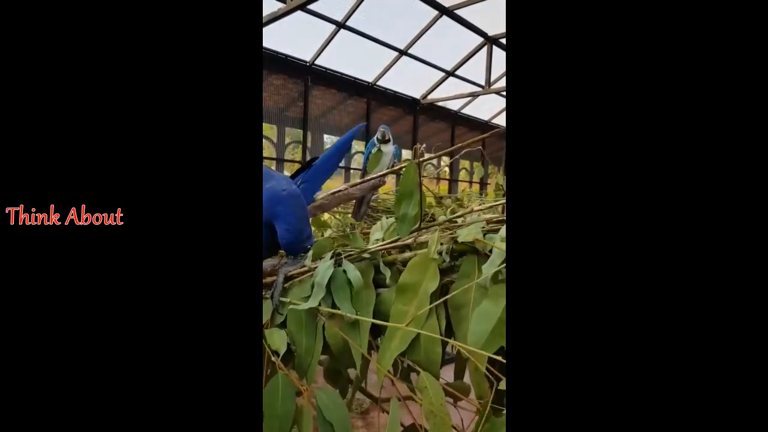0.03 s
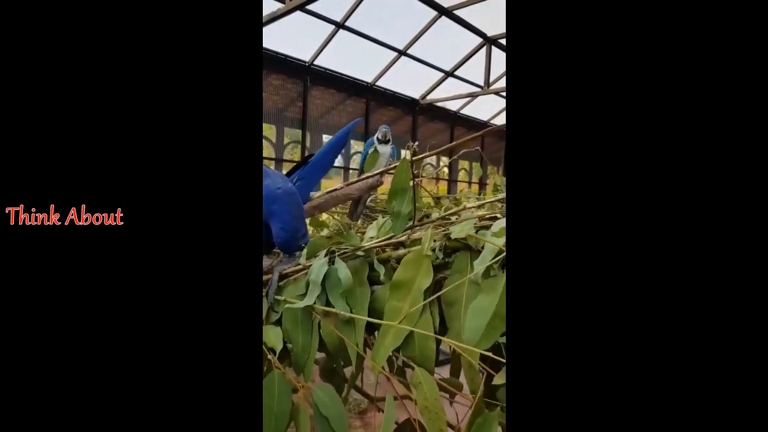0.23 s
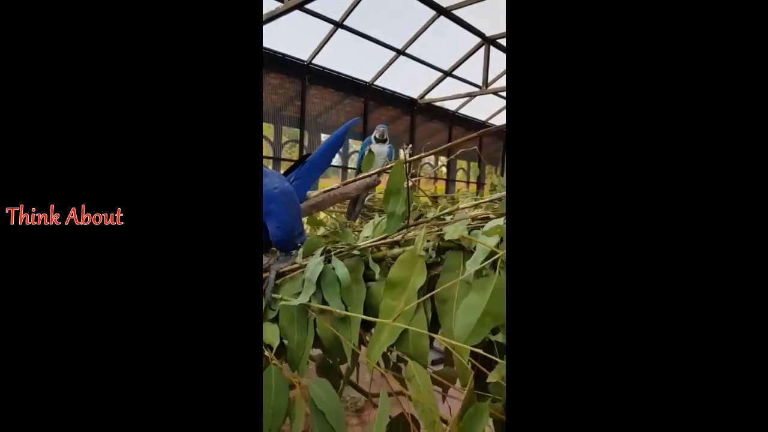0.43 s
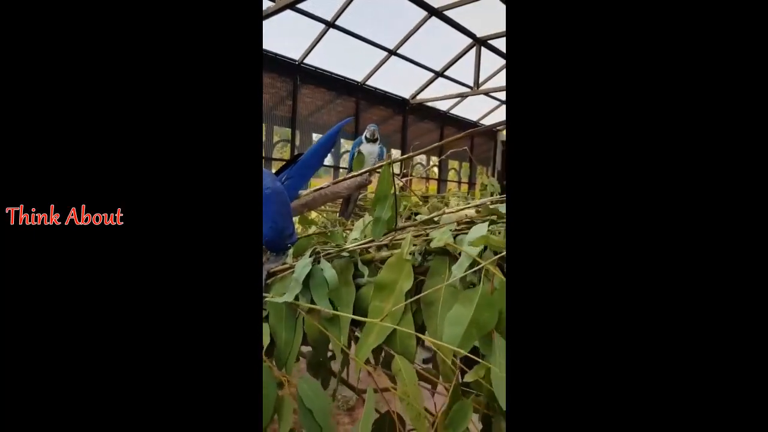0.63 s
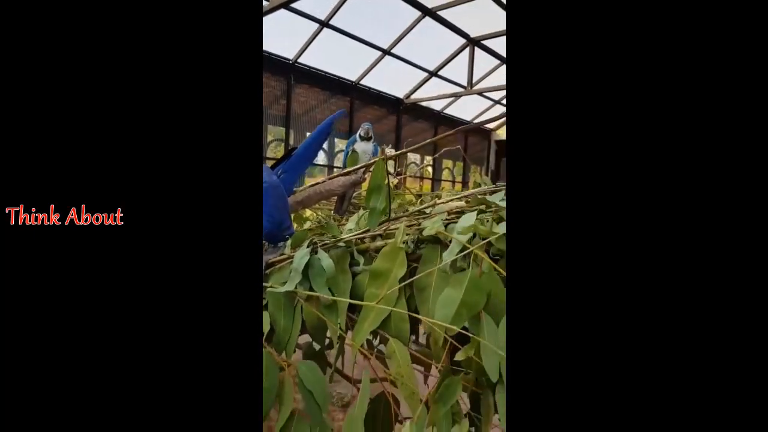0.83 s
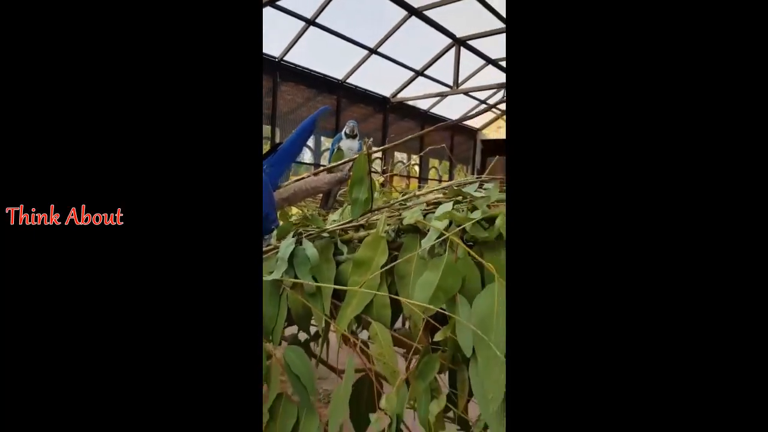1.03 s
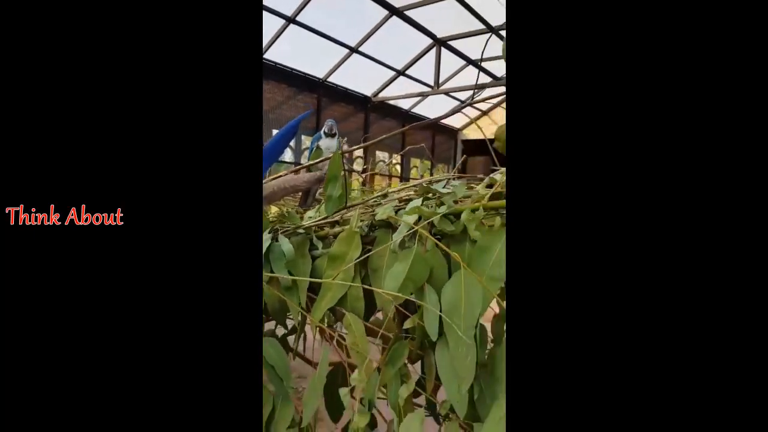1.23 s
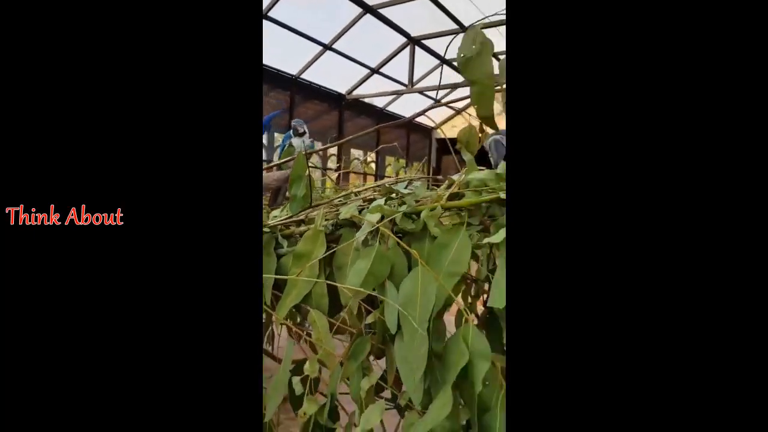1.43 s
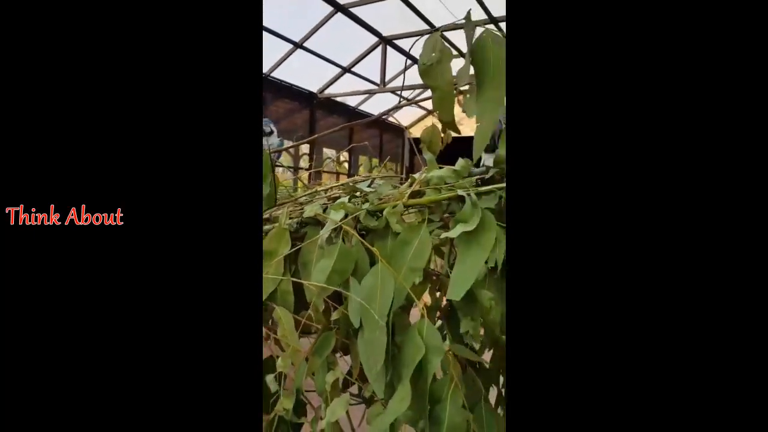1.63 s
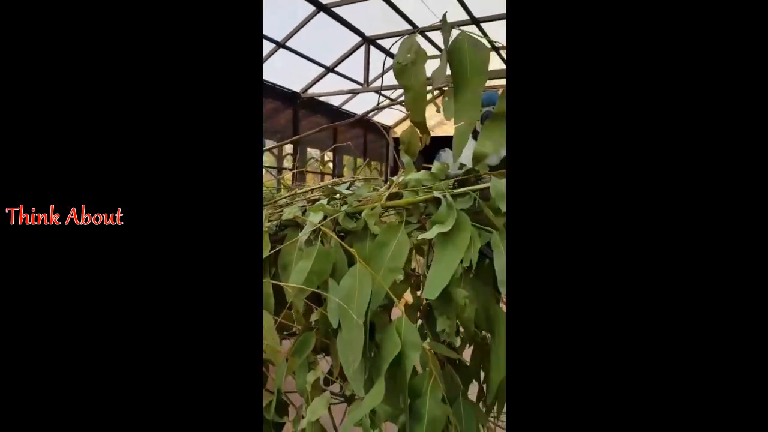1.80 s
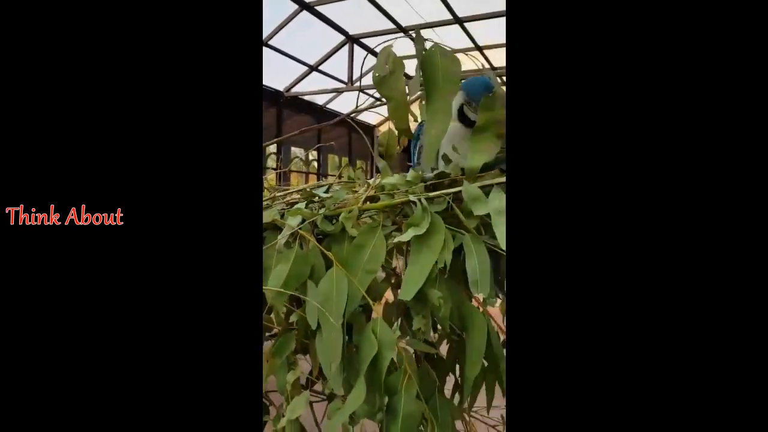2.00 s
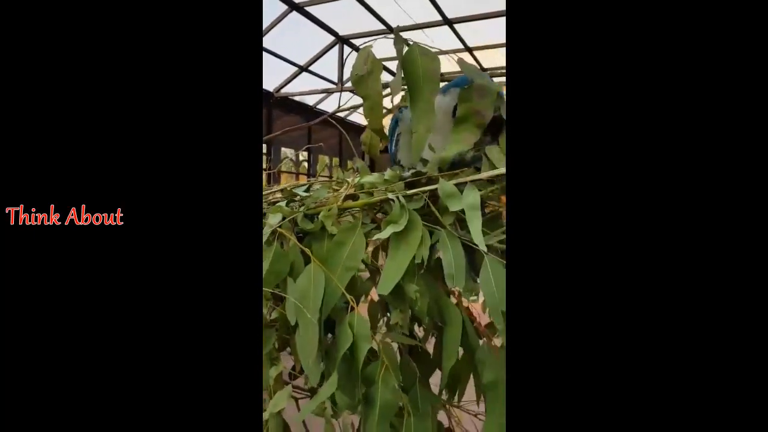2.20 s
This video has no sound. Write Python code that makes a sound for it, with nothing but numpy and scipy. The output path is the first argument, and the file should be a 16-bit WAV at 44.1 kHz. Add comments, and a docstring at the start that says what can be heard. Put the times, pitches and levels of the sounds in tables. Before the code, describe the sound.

A macaw gives one short, harsh call close by in an aviary, a growl breaking into a rasping rattle. Twigs snap before and after it, and leaves rustle softly over a low, throbbing machinery hum.

```python
"""A macaw gives one harsh call close by in a netted aviary: a low growl breaking into a rasping rattle.
Syrinx pulses, each with a puff of turbulence, ring the throat and beak resonances.
Leaves rustle and twigs snap as birds clamber through cut branches; one soft scrape comes late.
Machinery hums, its close tones beating in a slow throb, over faint open-air noise."""
import sys
import numpy as np
from scipy import signal
from scipy.io import wavfile

SR = 44100
rng = np.random.default_rng(int(sys.argv[2]) if len(sys.argv) > 2 else 0)


def inscribe(sig):
    """Save sig as 16-bit PCM at rate SR to the path in sys.argv[1].

    A 1-D sig is mono; a 2-D sig holds one channel per row.
    Samples are clipped to [-1, 1] before scaling.
    """
    pcm = np.round(np.clip(np.atleast_2d(sig).T, -1, 1) * 32767)
    wavfile.write(sys.argv[1], SR, pcm.astype(np.int16))


N = 99577
T = np.arange(N) / SR

# Twig crack and leaf crackle resonances: (frequency [Hz], width [Hz], relative level [dB])
CRACK_MODES = [(2430, 150, 10), (4120, 180, 9.5), (4900, 870, 2.5), (7350, 530, -0.5), (9640, 1450, 1),
               (12700, 1400, -9)]


def macaw():
    """Pulses and rasp ring the moving throat and the fixed upper resonances."""
    # Throat and beak resonances: (frequency [Hz], width [Hz], relative level [dB])
    throat_modes = [(273, 134, -11), (588, 164, -6), (882, 256, -3), (1036, 150, 5.5), (1540, 130, 2),
                    (1798, 73, 3.5)]
    upper_modes = [(2700, 89, -31), (3106, 134, 5), (3280, 156, 5), (3580, 92, 2), (3770, 69, 2),
                   (6310, 340, -2), (7050, 320, -4), (10800, 2600, -25)]
    # Throat resonances sink mid-call: (time [s], frequency ratio [1])
    throat_shift = [(1.045, 1.24), (1.056, 0.95), (1.09, 0.98), (1.125, .85), (1.19, 0.894), (1.24, .99),
                    (1.34, 1.034)]
    throat_rasp, upper_rasp, upper_db, right_lag_s = .48, .42, -3.5, .00022
    pulses, bright = syrinx()
    drive = pulses + throat_rasp * puffs(pulses)
    shift, = in_time(throat_shift)
    ratios = np.linspace(shift.min(), shift.max(), 9)
    low = 0
    for ratio, share in zip(ratios, np.eye(len(ratios))):  # crossfade static throat shapes
        modes = [(hz * ratio, width_hz, db) for hz, width_hz, db in throat_modes]
        low = low + body(drive * np.interp(shift, ratios, share), modes)
    low = butterworth(low, 2, [140, 2300], "band")
    high = body(bright + upper_rasp * puffs(bright), upper_modes)
    voice = low + from_db(upper_db) * butterworth(high, 2, [2000, 13500], "band")
    direct = np.array([voice, np.roll(voice, int(right_lag_s * SR))])
    return pan(direct + aviary(voice, near_db=-6.5, room_db=-18), left_db=1.1)


def syrinx():
    """Bursts of a few hard pulses interrupt the growl. Returns (throat, upper) drives."""
    # Rattle: (peak time [s], pulse rate [Hz], level [dB], Gaussian sigma [s], upper drive offset [dB])
    bursts = [(1.0388, 295, -21, .005, -5), (1.2242, 258, -24, .0021, 2), (1.2472, 256, -21.2, .0043, 2),
              (1.2768, 259, -20.8, .0042, 1.5), (1.3071, 272, -21, .0047, 2), (1.3355, 263, -22, .0056, 0),
              (1.3678, 230, -31, .004, -7)]
    jitter_s = .00014
    drive, steps = growl(), np.arange(-1, 4)
    for peak_s, hz, db, sigma_s, upper_db in bursts:
        times_s = peak_s + steps / hz + jitter_s * rng.standard_normal(len(steps))
        pulses = np.zeros(N)
        pulses[(times_s * SR).astype(int)] = from_db(db) * np.sqrt(SR / hz)
        swell = gaussian(peak_s, sigma_s)
        drive = (1 - swell) * drive + swell * pulses * from_db([[0], [upper_db]])
    return drive


def growl():
    """Unevenly timed strong-weak pulses. Returns (throat, upper) drives."""
    # Voice pitch: (time [s], pulse rate [Hz])
    pitch = [(1.04, 297), (1.062, 264), (1.09, 253), (1.115, 228), (1.205, 213), (1.245, 245), (1.34, 240)]
    # Depth of jitter and alternation: (time [s], share [0-1])
    unevenness = [(1.05, .4), (1.085, .25), (1.12, 1)]
    # Growl envelope: (time [s], level [dB], upper drive offset [dB])
    envelope = [(1.034, -31, -1), (1.06, -28, -2), (1.085, -29, -7.5), (1.11, -34, -5.5),
                (1.16, -32, -11.5), (1.2, -30.5, -6.5), (1.235, -35.5, -4), (1.265, -28, -1.5),
                (1.345, -28, 1), (1.351, -38, -2)]
    max_jitter_s, shimmer_db, max_alternation_db = .00048, 1.0, 1.2
    hz, = in_time(pitch)
    uneven, = in_time(unevenness)
    level_db, upper_db = in_time(envelope)
    voiced = (T > envelope[0][0]) * (T < envelope[-1][0])
    cycles = np.cumsum(hz * voiced) / SR
    onsets = np.flatnonzero(np.diff(np.ceil(cycles)))
    jitter, shimmer = rng.standard_normal((2, N))[:, :len(onsets)]
    alternation_db = max_alternation_db * uneven[onsets] * (-1) ** np.arange(len(onsets))
    pulse_db = level_db[onsets] + shimmer_db * shimmer + alternation_db
    offsets = (max_jitter_s * SR * uneven[onsets] * jitter).astype(int)
    pulses = np.zeros(N)
    pulses[onsets + offsets] = from_db(pulse_db) * np.sqrt(SR / hz[onsets])
    return np.array([pulses, pulses * from_db(upper_db)])


def puffs(pulses, decay_s=.0014):
    """Decaying turbulence after each pulse."""
    pole = np.exp(-2 / (decay_s * SR))
    power = signal.lfilter([1 - pole], [1, -pole], pulses ** 2 + 1e-18)
    return np.sqrt(power) * rng.standard_normal(N)


def twigs():
    """Each break rings the wood; tearing fibres add a bright crack."""
    # Snaps: (time [s], level [dB], main ring [Hz], ring width [Hz], low ring [Hz], low ring offset [dB],
    # crack decay [s], crack offset [dB], pan left [dB])
    snaps = [(0.2653, -15.5, 4200, 520, 2720, -5, .0028, -22, 2.3),
             (0.7128, -19, 3920, 380, 2150, -9, .0013, 1.5, 3),
             (1.371, -45, 3480, 400, 1350, -8, .005, 6, -3),
             (1.483, -26, 4170, 500, 1400, -10, .0024, -13, 5),
             (1.7771, -14.5, 3500, 360, 2200, -12, .0023, -22, -3)]
    break_db = 4.5
    knock_mode = (1400, 600, -23)  # (frequency [Hz], width [Hz], relative level [dB])
    out = 0
    for at_s, db, hz, width_hz, low_hz, low_db, decay_s, crack_db, left_db in snaps:
        impulse = from_db(break_db) * (np.arange(N) == int(at_s * SR))
        wood = body(impulse, [(hz, width_hz, 0), (low_hz, width_hz, low_db), knock_mode])
        tear = rng.standard_normal(N) * (T >= at_s) * np.exp(-np.abs(T - at_s) / decay_s)
        crack = from_db(crack_db) * body(tear, CRACK_MODES)
        out = out + from_db(db) * pan(wood + crack, left_db)
    return out + aviary(out.mean(axis=0), near_db=-1.5, room_db=-6)


def leaves():
    """Soft brushing of leaves with tiny crackles."""
    # Rustle envelope: (time [s], level [dB])
    envelope = [(0, -36.5), (.08, -43), (.18, -46.5), (.24, -42), (.42, -45.5), (.51, -35), (.62, -43),
                (.69, -40), (.85, -40), (1.0, -41), (1.36, -43.5), (1.5, -43.5), (1.6, -52.5),
                (1.69, -43.5), (1.75, -54), (1.89, -49), (2.03, -46.5), (2.25, -52)]
    # Brushing spectrum: (frequency [Hz], relative density [dB])
    spectrum = [(140, -7.5), (254, -1), (370, -8), (442, -5.5), (1220, 0), (1920, 2), (2480, 3),
                (3030, 1.5), (4770, 0.5), (5710, -1), (12900, -5), (16000, -14)]
    crackles_per_s, crackle_db = 760, -27
    level_db, = in_time(envelope)
    grains = (rng.random((2, N)) < crackles_per_s / SR) * rng.standard_normal((2, N))
    crackle = from_db(crackle_db) * rms_one(body(grains, CRACK_MODES))
    brushing = banded_noise(spectrum, flicker_db=2.5)
    return pan(from_db(level_db) * (brushing + crackle), left_db=.16)


def rub(level_db=-56):
    """Short, soft scrape with one woody resonance."""
    scrape = rms_one(resonance(rng.standard_normal(N), hz=980, width_hz=220))
    return from_db(level_db) * gaussian(peak_s=1.72, sigma_s=.03) * scrape


def machinery():
    """Low tones waver and beat over a faint rumble; the whole fades slowly."""
    # Hum tones: (frequency [Hz]) and (starting level [dB])
    tones_hz = [53.7, 65.9, 100.2]
    tones_db = [-45.5, -44, -58]
    # Rumble spectrum: (frequency [Hz], relative density [dB])
    spectrum = [(25, 3), (42, -14), (80, -1.5), (150, -13), (400, -23)]
    first_throb_s, waver_db, rumble_db, fade_db_per_s = .015, 1.0, -52.5, 1.0
    hum = 0
    for hz, db in zip(tones_hz, tones_db):
        tone = np.sqrt(2) * np.cos(2 * np.pi * hz * (T - first_throb_s))
        hum = hum + from_db(db + waver_db * drift(rate_hz=15)) * tone
    rumble = from_db(rumble_db) * banded_noise(spectrum, flicker_db=2.5)
    return from_db(-fade_db_per_s * T) * (hum + rumble)


def open_air(level_db=-52.5):
    """Faint broadband background."""
    # Air spectrum: (frequency [Hz], relative density [dB])
    spectrum = [(76, -28), (130, -11), (194, -1), (418, -20), (501, -14.5), (796, -15.5), (2410, -10.5),
                (4680, -18.5), (5180, -30.5), (11400, -24.5), (16000, -19.5)]
    return from_db(level_db) * banded_noise(spectrum, flicker_db=1.9)


def aviary(x, near_db, room_db):
    """Scatter from nearby branches plus the enclosure's tail."""
    return from_db(near_db) * echoes(x, t60_s=.045) + from_db(room_db) * echoes(x, t60_s=.58)


def echoes(x, t60_s, rise_s=.0009, wall_cut_hz=9000):
    """Dense, dulled, decaying reflections; both sides share the bass."""
    mid, side = rng.standard_normal((2, N)) * from_db(-60 * T / t60_s) * (1 - np.exp(-T / rise_s))
    side = butterworth(side, 1, 600, "high")
    tail = butterworth([mid + side, mid - side], 1, wall_cut_hz, "low")
    return signal.fftconvolve(x[None], tail, axes=1)[:, :N] / np.sqrt(2 * np.sum(mid ** 2))


def banded_noise(spectrum, flicker_db):
    """Unit-power stereo noise in flickering half-octave bands."""
    # Stereo image: (frequency [Hz], left-right correlation [-1 to 1])
    correlation = [(60, 0.94), (130, 0.97), (290, 0.89), (640, 0.66), (1400, 0.45), (3100, -0.35),
                   (7000, 0.16), (15000, -0.042)]
    edges_hz = 24 * 2 ** np.arange(0, 9.6, .5)
    common = drift(rate_hz=29.78)
    white = rng.standard_normal((2, 2, N))
    out = 0
    for k, (low_hz, high_hz) in enumerate(zip(edges_hz, edges_hz[1:])):
        mid, side = butterworth(white[k % 2], 2, [low_hz, high_hz], "band")
        hz = np.sqrt(low_hz * high_hz)
        alike = at_hz(correlation, hz)
        band = np.sqrt(1 + alike) * mid + np.sqrt(1 - alike) * side * [[1], [-1]]
        flicker = .12 * common + drift(rate_hz=35.02)
        out = out + from_db(at_hz(spectrum, hz) + flicker_db * flicker) * band
    return rms_one(out)


def body(x, modes):
    """Parallel resonances; roughly keeps the power of white input."""
    power = sum(from_db(db) ** 2 * np.pi * width_hz / SR for _, width_hz, db in modes)
    return sum(from_db(db) * resonance(x, hz, width_hz) for hz, width_hz, db in modes) / np.sqrt(power)


def resonance(x, hz, width_hz):
    """Two-pole resonator, unit peak gain."""
    r = np.exp(-np.pi * width_hz / SR)
    feedback = [1, -2 * r * np.cos(2 * np.pi * hz / SR), r * r]
    return signal.lfilter(np.array([1, 0, -1]) * (1 - r * r) / 2, feedback, x + 1e-18)


def butterworth(x, order, hz, kind):
    return signal.sosfilt(signal.butter(order, hz, kind, fs=SR, output="sos"), x)


def drift(rate_hz):
    """Random wander, unit RMS."""
    knots = rng.standard_normal(4096)
    return rms_one(np.interp(T * rate_hz, np.arange(len(knots)), knots))


def gaussian(peak_s, sigma_s):
    return np.exp(-.5 * ((T - peak_s) / sigma_s) ** 2)


def in_time(rows):
    """Interpolate each value column at every sample."""
    times_s, *columns = np.transpose(rows)
    return [np.interp(T, times_s, column) for column in columns]


def at_hz(rows, hz):
    """Interpolate on a log-frequency axis."""
    knots_hz, values = np.transpose(rows)
    return np.interp(np.log(hz), np.log(knots_hz), values)


def pan(x, left_db):
    return x * from_db([[left_db], [-left_db]])


def from_db(db):
    return 10 ** (np.asarray(db) / 20)


def rms_one(x):
    return x / np.sqrt(np.mean(x ** 2) + 1e-20)


def scene():
    """Bird, branches, hum and air in stereo."""
    return macaw() + twigs() + leaves() + rub() + machinery() + open_air()


def record(dry):
    """Steep low-pass."""
    cutoff_hz = 16000
    return signal.sosfilt(signal.ellip(10, .2, 80, cutoff_hz, fs=SR, output="sos"), dry)


dry = scene()
out = record(dry)
inscribe(out)
```